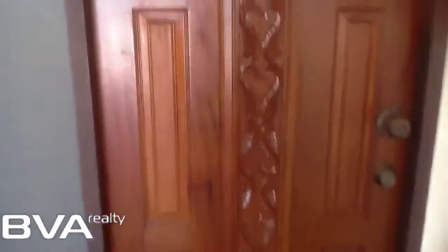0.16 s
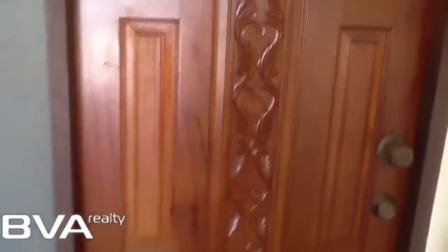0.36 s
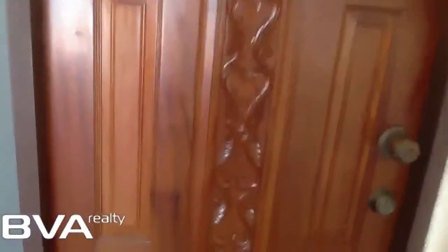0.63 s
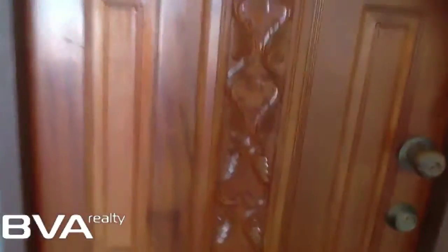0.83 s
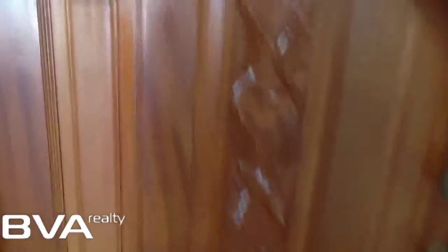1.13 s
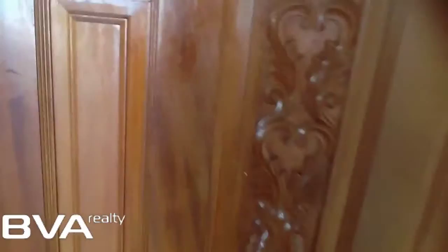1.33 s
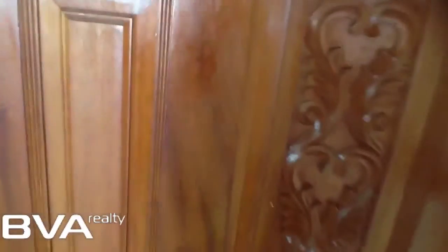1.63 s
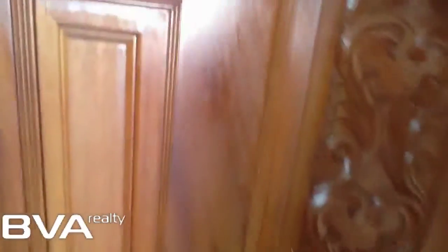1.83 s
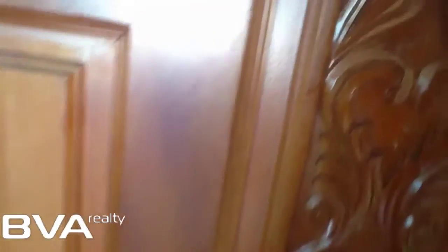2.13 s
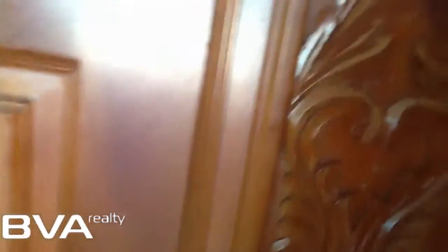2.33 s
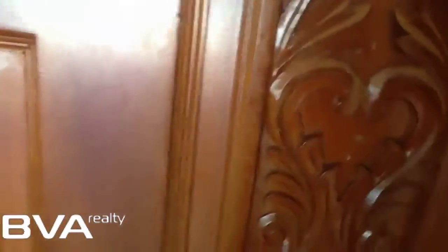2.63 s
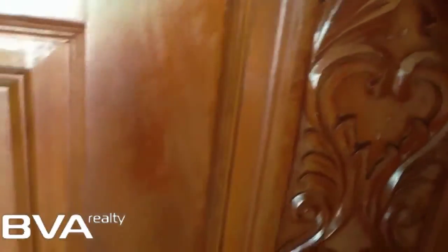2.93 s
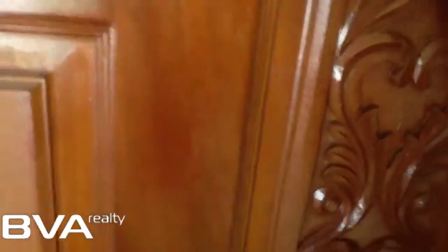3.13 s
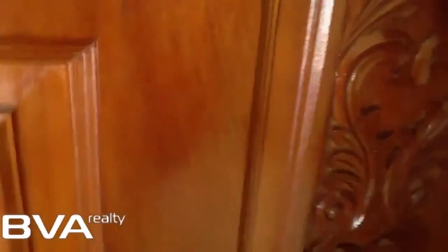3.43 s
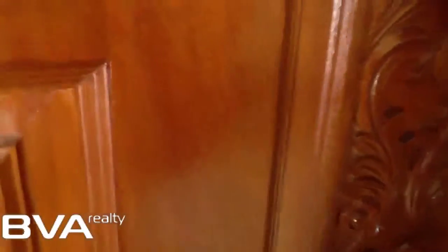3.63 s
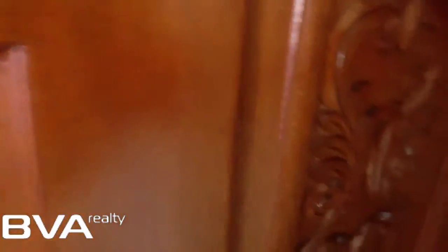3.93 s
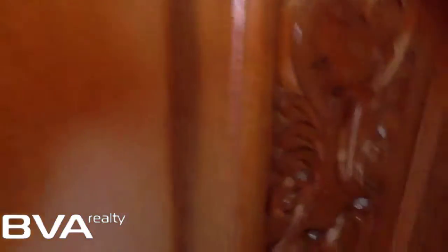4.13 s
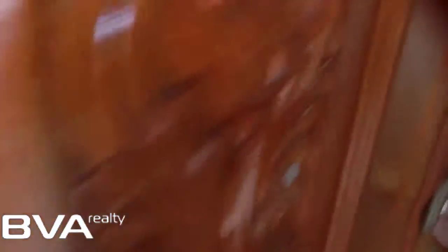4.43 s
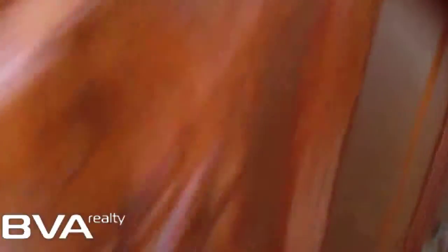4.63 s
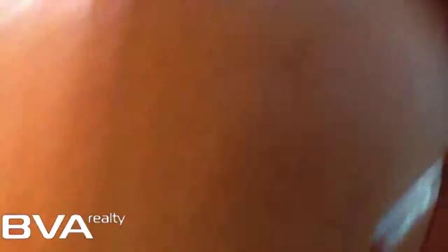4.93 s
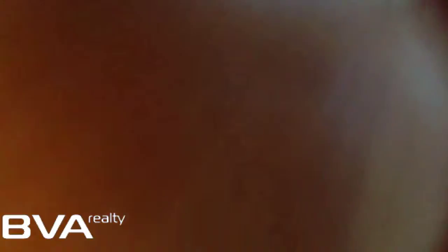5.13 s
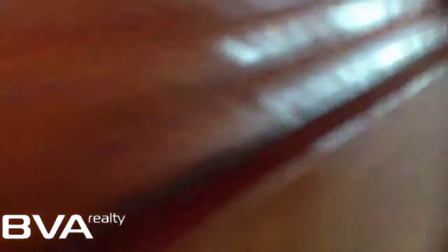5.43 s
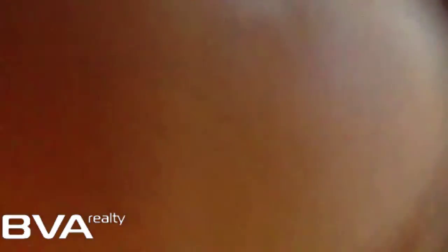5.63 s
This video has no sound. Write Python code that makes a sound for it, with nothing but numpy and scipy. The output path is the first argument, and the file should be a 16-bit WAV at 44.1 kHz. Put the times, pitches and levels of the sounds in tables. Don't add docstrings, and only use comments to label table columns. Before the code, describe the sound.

Close to a handheld camera, a wooden door is unlatched in a bare hall. A sharp double click comes first, then a pause, a run of metal clicks and rubs, short hinge chirps, a falling squeal, a slowing groan and separate woody creak knocks. Low room tone and faint engine drone continue beneath.

```python
import sys
import numpy as np
from scipy import signal
from scipy.fft import rfft, irfft, next_fast_len
from scipy.io import wavfile
from scipy.ndimage import map_coordinates

SR = 44100
rng = np.random.default_rng(int(sys.argv[2]) if len(sys.argv) > 2 else 0)


def nominal_scale(level):
    x = np.asarray(level, float) / 20
    return 10 ** x


def materialize(psi):
    bounded = np.clip(np.atleast_2d(psi).T, -1, 1)
    quanta = np.round(bounded * 32767).astype(np.int16)
    wavfile.write(sys.argv[1], SR, quanta)


N = 254898
TIME_S = np.arange(N) / SR

# (time [s], slip rate [Hz], level [dB])
CHIRP = [
    (2.465, 543, -54),
    (2.492, 596, -38.5),
    (2.509, 616, -46),
    (2.523, 612, -37.5),
    (2.565, 615, -62),
]
PEEP = [
    (3.018, 1346, -62),
    (3.034, 1329, -51),
    (3.068, 1338, -49.5),
    (3.092, 1342, -62),
    (3.15, 1330, -68),
]
SQUEALS = [
    [(3.535, 992, -52), (3.555, 927, -52.5), (3.619, 936, -50.5), (3.643, 935, -53), (3.668, 910, -62)],
    [(3.674, 835, -50), (3.69, 808, -47.5), (3.742, 822, -51), (3.768, 722, -49), (3.825, 703, -49.5),
     (3.876, 705, -49), (3.905, 632, -48), (3.983, 607, -52), (4.075, 605, -63)],
]
CATCHES = [2.513, 3.04, 3.593, 3.722, 3.764, 3.846, 3.907, 3.987]
# (centre [Hz], width [Hz], gain [dB])
HINGE_MODES = [(612, 70, 1.5), (825, 90, 2), (940, 90, 2.5), (1220, 100, -1), (1410, 110, 6),
               (1850, 160, 0), (2130, 130, 5), (2430, 130, 7), (2670, 120, 4), (3250, 450, -1),
               (4500, 900, -6)]
PARTIAL_FALL_DB = [8, 4.5, 8, 3.5]
# (time [s], slip rate [Hz], level [dB])
GROAN = [(4.268, 412, -48), (4.291, 392, -46), (4.322, 386, -51), (4.378, 286, -41), (4.419, 270, -45),
         (4.47, 213, -45), (4.553, 167, -44), (4.667, 90.4, -45), (4.71, 70.3, -62)]
# (centre [Hz], width [Hz], gain [dB])
LEAF_MODES = [(366, 280, -9.5), (803, 140, -3.5), (1190, 200, -4.5), (1410, 120, -3), (1550, 230, -9),
              (2020, 150, -29)]
# (rate [Hz], width [Hz], gain [dB])
SWING_MODES = [(172, 40, 0), (275, 50, 1), (388, 40, 2)]
# (time [s], peak [dB], knock [dB], pin [dB])
SLIPS = [(4.802, -29.5, -9, -2), (4.8384, -32, -7, -7), (4.8657, -34.5, -1.5, -12), (4.8896, -29.5, -9, -4),
         (4.9144, -38, -9, -13), (4.9367, -32.5, -10, -6), (4.9581, -34, -7, -13), (5.469, -36.5, -7, -21),
         (5.4996, -31, -1.5, -25), (5.5323, -23, -6, -30), (5.56, -27, -8, -27), (5.588, -29, -9.5, -23),
         (5.6151, -26.5, -6.5, -19.5), (5.6471, -30.5, -7, -27), (5.6904, -28.5, -8.5, -16),
         (5.7754, -24, -11, -23)]
# (centre [Hz], width [Hz], gain [dB])
PLATE_MODES = [(1415, 120, -2), (1800, 200, -5.5), (2024, 97, 2.5), (2363, 195, -1), (3150, 380, -7),
               (3670, 370, -6), (4400, 670, -8)]
# (centre [Hz], width [Hz], gain [dB])
PIN_MODES = [(5260, 330, -2), (6860, 1700, -7), (8580, 1500, -13.5)]
# (centre [Hz], width [Hz], gain [dB])
PANEL_MODES = [(182, 33, -5), (345, 55, -4.5), (547, 37, -0.5), (688, 45, -7), (983, 32, -0.5),
               (1402, 24, -3)]

# (time [s], peak [dB], ring [Hz], knock [dB], bright edge [dB])
CLICKS = [(0.3385, -29.5, 2510, -4.5, -24), (0.3427, -31.5, 2380, -11.5, -13),
          (0.5274, -46.5, 1540, -14, -23), (1.9797, -47, 2030, 3.5, -20), (2.1171, -35, 4170, 1, -12),
          (2.142, -35, 1570, -7, -31), (2.157, -28.5, 1570, -5, -13), (2.2012, -32.5, 1570, -10, -10),
          (2.2799, -42.5, 2300, 3, -11.5), (2.369, -41.5, 2050, -4, -14), (2.4024, -39.5, 1590, 2.5, -16),
          (2.4725, -35.5, 1570, -4, -12.5), (2.5474, -43, 1800, -6, -26), (2.6753, -37.5, 2720, -8, -17),
          (2.748, -44, 3140, -9, -2.5), (2.832, -47.5, 2240, -8, -5.5), (2.9169, -29.5, 3700, -7, -15.5),
          (3.1872, -43, 1810, -7, -27), (3.256, -38.5, 1820, -5, -7.5), (4.6808, -39.5, 1550, -3, -16),
          (5.1213, -43, 2100, 0, -12)]
# (frequency [Hz], density [dB per Hz])
CRACK_SPECTRUM = [(300, -30), (700, -12.5), (1200, 2), (3500, -1), (4800, -6.5), (7000, -44.5),
                  (12000, -120)]
# (frequency [Hz], density [dB per Hz])
EDGE_SPECTRUM = [(2500, -46), (4500, 0), (6500, -3.5), (8000, -10.5), (10000, -16), (13000, -120)]
# (centre [Hz], width [Hz], gain [dB])
LOCK_WOOD_MODES = [(300, 240, -2), (560, 140, 2), (830, 160, 3.5), (1105, 77, -3.5), (1570, 230, -17.5)]
# (frequency [Hz], peak [dB], T60 [s])
THUMP = (70, -46, 0.3)
# (time [s], length [s], centre [Hz], width [Hz], level [dB])
RUBS = [(.11, .05, 1520, 150, -53.5), (.35, .03, 330, 250, -46), (.345, .053, 2560, 3200, -49),
        (.37, .098, 1800, 2700, -54), (1.435, .076, 2150, 350, -57), (1.963, .06, 520, 300, -53),
        (1.979, .042, 1970, 300, -56.5), (2.12, .024, 1200, 300, -43.5), (2.138, .04, 420, 130, -44),
        (2.157, .018, 810, 200, -40), (2.467, .042, 1050, 100, -45), (2.47, .07, 1500, 2500, -50.5),
        (3.184, .08, 1900, 800, -51), (3.201, .13, 920, 300, -52), (5.153, .1, 4500, 1510, -57.5),
        (5.4, .12, 560, 200, -52)]

# (frequency [Hz], T60 [s])
HALL_T60 = [(200, .5), (1500, 0.27), (8000, 0.14)]
# (time [s], level [dB])
AIR_LEVEL = [(0.0, -50.5), (1.29, -50.5), (2.09, -49.5), (2.37, -48), (2.74, -48.5), (3.6, -48.5),
             (3.78, -47), (4.09, -48), (4.3, -49.5), (4.46, -45.5), (5.2, -47), (5.78, -47.5)]
# (frequency [Hz], density [dB per Hz])
AIR_BODY = [(15, -57), (25, -43.5), (45, -29.5), (75, -26), (115, -15), (140, -7.5), (200, -3.5), (280, -7),
            (420, -10.5), (900, -13.5), (1400, -17), (2500, -29), (3300, -43), (5500, -120)]
# (frequency [Hz], density [dB per Hz])
AIR_HISS = [(880, -33.5), (1500, -2.5), (2200, -1.5), (3000, -0.5), (5000, -4), (7300, -6), (8500, -14.5),
            (10500, -4.5), (13000, -120)]
# (centre [s], half length [s], peak [dB])
STIRS = [(.4, .15, -57), (1.15, .12, -61), (3.25, .2, -62), (4.54, .08, -55), (5.2, .1, -59)]
# (centre [s], half length [s], peak [dB])
DRONE_SWELLS = [
    [(1.06, .33, -54.5), (1.7, .15, -59), (3.1, .8, -62), (5.01, .06, -55), (5.42, .1, -61)],
    [(.1, .14, -50), (.56, .15, -55), (4.72, .08, -53), (5.09, .12, -53)],
    [(1.25, .4, -58), (1.98, .2, -50), (2.8, .4, -49), (3.45, .2, -52), (4.3, .6, -52), (5.02, .09, -47),
     (5.6, .11, -44.5)],
    [(.12, .12, -51), (.56, .2, -56), (3.05, .1, -55), (3.6, .6, -60), (5.1, .06, -53)],
]
# (frequency [Hz], wander [Hz], resting level [dB])
DRONE_LINES = [(96.5, 1.2, -74), (143, 3.52, -62), (173, 2.6, -61), (241, 2.5, -65)]
# (from [s], to [s], edge [Hz])
TREBLE_EDGES = [(.31, .4, 10000), (.46, .5, 6400), (1.2, 1.26, 9000), (1.68, 1.74, 9100),
                (2.15, 2.22, 9000), (2.89, 2.94, 9000), (4.77, 4.85, 9700), (5.15, 5.2, 9100),
                (2.31, 2.34, 5200), (2.54, 2.58, 5300), (3.695, 3.715, 4500), (4.68, 4.75, 6700),
                (4.97, 5.075, 5500), (5.0, 5.055, 4600), (5.015, 5.04, 3000), (2.14, 2.15, 5200),
                (5.5, 5.8, 6400)]


def unit(x):
    return x / np.sqrt(np.mean(x ** 2) + 1e-20)


def along(points, hz):
    f, v = np.transpose(points)
    return np.interp(np.log(hz + 1), np.log(f + 1), v)


def curves(rows):
    s, *cols = np.transpose(rows)
    return [np.interp(TIME_S, s, c) for c in cols]


def gate(rows, edge_s=0.0065):
    return np.clip(np.minimum(TIME_S - rows[0][0], rows[-1][0] - TIME_S) / edge_s + .5, 0, 1)


def swells(rows):
    return sum(nominal_scale(db) * np.exp(-((TIME_S - s) / half_s) ** 2) for s, half_s, db in rows)


def wobble(rate_hz, size=N):
    knots = rng.standard_normal(int(size * rate_hz / SR) + 4)
    return map_coordinates(knots, [TIME_S[:size] * rate_hz])


def filtered(x, response):
    m = next_fast_len(len(x) + 8192)
    return irfft(rfft(x, m) * response(np.fft.rfftfreq(m, 1 / SR)), m)[:len(x)]


def noise(spectrum, size=N):
    return unit(filtered(rng.standard_normal(size), lambda hz: nominal_scale(along(spectrum, hz))))


def bell(x, centre, width):
    return 1 / (1 + (2 * (x - centre) / width) ** 2)


def body(modes, spread):
    def response(f):
        total = 0
        for k, (centre, width, db) in enumerate(modes):
            damping = 1j * f * width * spread
            total = total + (-1) ** k * nominal_scale(db) * damping / (centre ** 2 - f * f + damping)
        return total
    return response


def add(track, s, sound):
    part = track[round(s * SR):][:len(sound)]
    part += sound[:len(part)]


def squeals():
    out = np.zeros(N)
    grip = np.prod([1 - 0.7 * np.exp(-((TIME_S - s) / 0.006) ** 2) for s in CATCHES], axis=0)

    def carried(f):
        return np.sqrt(sum(nominal_scale(2 * db) * bell(f, c, w) for c, w, db in HINGE_MODES))

    for rows, fall_db in zip([CHIRP, PEEP, *SQUEALS], PARTIAL_FALL_DB):
        span = slice(round((rows[0][0] - .01) * SR), round((rows[-1][0] + .01) * SR))
        hz, db = (c[span] for c in curves(rows))
        size = len(hz)
        phase = 2 * np.pi * np.cumsum(hz * (1 + .015 * wobble(130, size))) / SR
        stack = np.zeros(size)
        for k in range(1, 7):
            partial_db = db + 3.5 - fall_db * (k - 1) + 3.3 * wobble(110, size)
            stack += carried(k * hz) * nominal_scale(partial_db) * np.sin(k * phase + k)
        out[span] += (gate(rows) * grip)[span] * stack
    return out


def groan():
    scrape_db, scrape_fall_db_per_hz, swing_db = -13.5, .07, -4
    rate_hz, db = curves(GROAN)
    on = gate(GROAN)
    cycles = np.cumsum(rate_hz * (on > 0)) / SR
    at = np.flatnonzero(np.diff(np.floor(cycles)))
    slip_hz = rate_hz[at]
    uneven = np.clip(1.3 - slip_hz / 220, .05, 1)
    draw = rng.standard_normal((len(at), 2))
    shift = np.round(.035 * uneven * draw[:, 0] * SR / slip_hz).astype(int)
    kicks = np.zeros(N)
    kicks[at + shift] = nominal_scale(1.2 * uneven * draw[:, 1]) / np.sqrt(slip_hz)

    leaf = filtered(kicks, lambda f: body(LEAF_MODES, spread=.8)(f) / (1 + 1j * (f / 2100) ** 3))
    scrape_gain = signal.lfilter([1], [1, -np.exp(-1 / (.003 * SR))], kicks)
    scrape_modes = PLATE_MODES[4:] + PIN_MODES[:1]
    scrape = scrape_gain * filtered(rng.standard_normal(N), body(scrape_modes, spread=5.8))
    swing_gain = sum(nominal_scale(g) * bell(rate_hz, c, w) for c, w, g in SWING_MODES)
    swing = swing_gain * np.sin(2 * np.pi * cycles)

    def level(x):
        return x / np.sqrt(np.mean(x[on > 0] ** 2))

    scrape_mix = nominal_scale(scrape_db - scrape_fall_db_per_hz * np.clip(rate_hz - 290, 0, None))
    mix = level(leaf) + scrape_mix * level(scrape) + nominal_scale(swing_db) * swing
    return on * nominal_scale(db + 1.5 * wobble(40)) * mix


def slips():
    out, t = np.zeros(N), np.arange(SR // 5) / SR

    def ring(x, modes, spread):
        y = filtered(x, body(modes, spread))
        return y / np.abs(y).max()

    for s, db, knock_db, pin_db in SLIPS:
        burst = (t == 0) + 0.11 * nominal_scale(-60 * t / 0.033) * rng.standard_normal(len(t))
        shudder = (t == 0) + .055 * nominal_scale(-60 * t / .08) * rng.standard_normal(len(t))
        plate = ring(burst, PLATE_MODES, 1)
        pin = nominal_scale(pin_db + 4.0) * ring(burst, PIN_MODES, 2.2)
        panel = nominal_scale(knock_db + 5.5) * ring(shudder, PANEL_MODES, 1.2)
        add(out, s, nominal_scale(db - 4.0) * (plate + pin + panel))
    return out


def clicks():
    t60_s, soft_s_per_db, hard_db = .035, .0012, -30
    out, t = np.zeros(N), np.arange(SR // 4) / SR
    size = len(t)
    attack = 1 - np.exp(-t * SR / 20)
    for s, db, hz, knock_db, edge_db in CLICKS:
        fade_db = -60 * t / np.clip(t60_s + soft_s_per_db * (hard_db - db), .01, .3)
        crack = (nominal_scale(fade_db) + 0.94 * nominal_scale(-60 * t / 0.0049)) * noise(CRACK_SPECTRUM, size)
        edge = nominal_scale(edge_db + 7.0 + 0.92 * fade_db) * noise(EDGE_SPECTRUM, size)
        ring = 0.91 * nominal_scale(1.3 * fade_db) * np.sin(2 * np.pi * hz * t)
        wood = unit(filtered(rng.standard_normal(size), body(LOCK_WOOD_MODES, spread=0.54)))
        knock = nominal_scale(knock_db + 5.5 + 0.55 * fade_db) * wood
        add(out, s, nominal_scale(db - 6.5) * attack * (crack + edge + ring + knock))
    hz, db, thump_t60_s = THUMP
    glide_s = 0.013 * (1 - np.exp(-t / .012))
    add(out, CLICKS[-1][0], nominal_scale(db - 60 * t / thump_t60_s) * np.sin(2 * np.pi * hz * (t + glide_s)))
    return out


def rubs():
    out = np.zeros(N)
    for s, length_s, hz, width_hz, db in RUBS:
        u = np.arange(round(length_s * SR)) / (length_s * SR)
        band = unit(filtered(rng.standard_normal(len(u)), lambda f: (f > 150) * bell(f, hz, width_hz)))
        add(out, s, nominal_scale(db) * 2.27 * u ** .3 * (1 - u) * band)
    return out


def hall(x):
    out, step = np.zeros(N), SR // 4
    for start in range(0, N, step):
        hz, t, z = signal.stft(rng.standard_normal(SR // 2), SR, nperseg=256)
        decay = nominal_scale(-60 * t / along(HALL_T60, hz)[:, None])
        tail = signal.istft(z * decay, SR, nperseg=256)[1]
        wet = signal.fftconvolve(x[start:start + step], tail / np.linalg.norm(tail))
        add(out, start / SR + .006, wet)
    return out


def air():
    hiss_db, hiss_follows = -61, -.6
    body_db, = curves(AIR_LEVEL)
    hiss = nominal_scale(hiss_db + hiss_follows * (body_db - body_db.mean())) + .5 * swells(STIRS)
    low = nominal_scale(body_db + .8 * wobble(5.67)) * noise(AIR_BODY)
    return low + hiss * nominal_scale(wobble(10)) * noise(AIR_HISS)


def drone():
    out = np.zeros(N)
    for rows, (hz, wander_hz, rest_db) in zip(DRONE_SWELLS, DRONE_LINES):
        gain = (nominal_scale(rest_db) + swells(rows)) * nominal_scale(1.0 + 1.6 * wobble(11))
        out += gain * np.sin(2 * np.pi * np.cumsum(hz + wander_hz * wobble(7)) / SR)
    return out


def scene():
    contacts, knocks, hinge = clicks(), slips(), squeals() + groan() + rubs()
    wet = hall(nominal_scale(-7.5) * contacts + nominal_scale(-5.5) * knocks + nominal_scale(-8) * hinge)
    return (contacts + knocks + hinge + wet + air() + drone())[None]


def camera_treble(x):
    lift_hz_per_db, lift_from_db = 110, 4
    hz, t, z = signal.stft(x, SR, window="cosine", nperseg=2048)
    band_hz = SR / 64
    band = np.ceil(hz / band_hz).astype(int)
    edge_hz = band_hz * rng.choice([9, 10, 10, 11, 11, 11, 11, 11, 11, 12, 12], len(t)) + 100
    treble = z[(hz > 5000) & (hz < 9000)]
    treble_db = 10 * np.log10(np.mean(np.abs(treble) ** 2, axis=0) + 1e-20)
    excess_db = np.clip(treble_db - np.median(treble_db) - lift_from_db, 0, None)
    edge_hz = np.minimum(edge_hz + lift_hz_per_db * excess_db, 9800)
    for start, end, fixed_hz in TREBLE_EDGES:
        edge_hz[(t >= start) & (t <= end)] = fixed_hz
    loss_odds = .12 * np.clip(hz[:, None] / edge_hz, 0, 1) ** 5
    lost = rng.random((band.max() + 1, len(t)))[band] < loss_odds
    kept = (hz[:, None] < edge_hz) & ~lost
    return signal.istft(z * kept, SR, window="cosine", nperseg=2048)[1][:N]


def band_limit(x):
    return signal.sosfilt(signal.butter(12, 10010, fs=SR, output="sos"), x)


def record(dry):
    mix = camera_treble(dry[0])[None]
    return band_limit(mix)


dry = scene()
out = record(dry)
materialize(out)
```